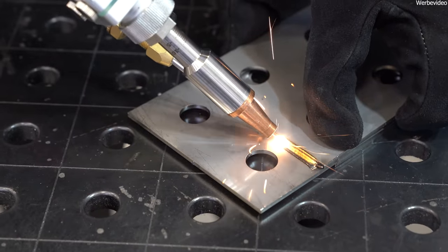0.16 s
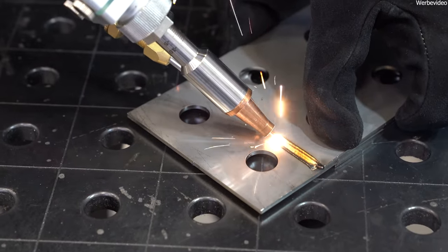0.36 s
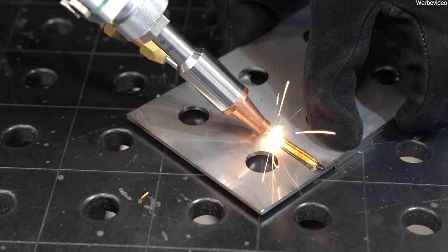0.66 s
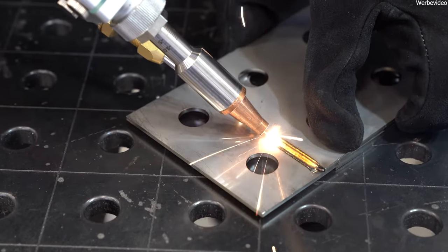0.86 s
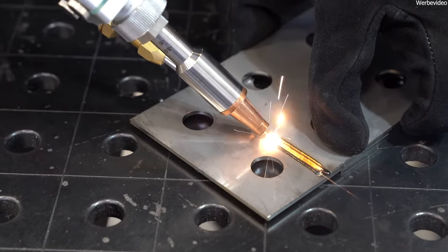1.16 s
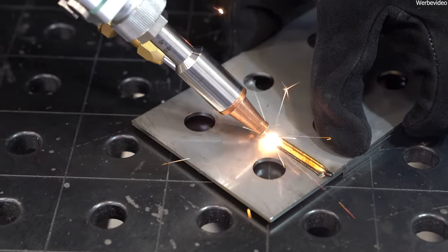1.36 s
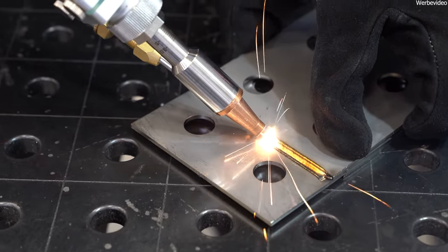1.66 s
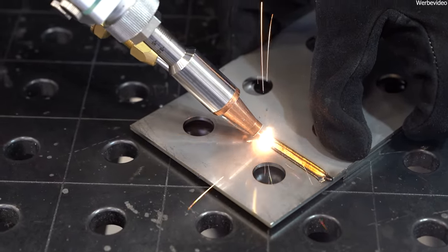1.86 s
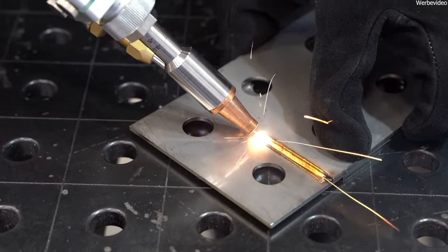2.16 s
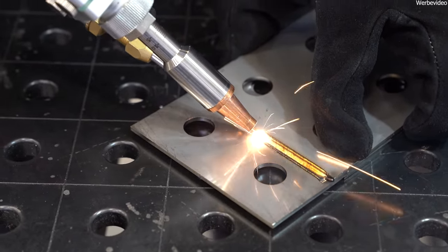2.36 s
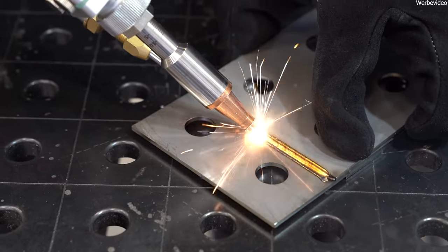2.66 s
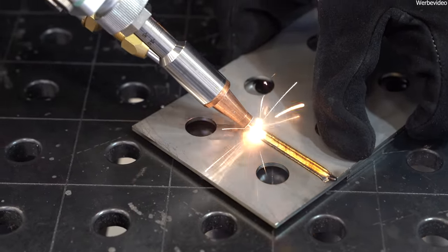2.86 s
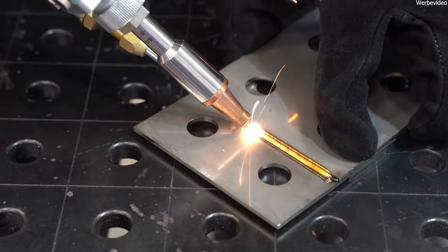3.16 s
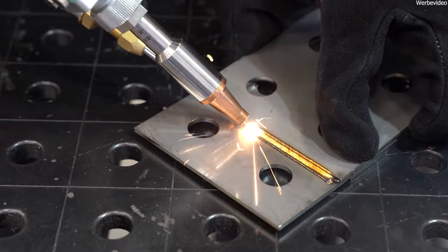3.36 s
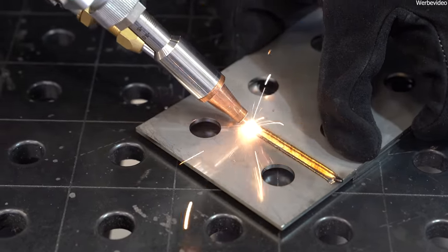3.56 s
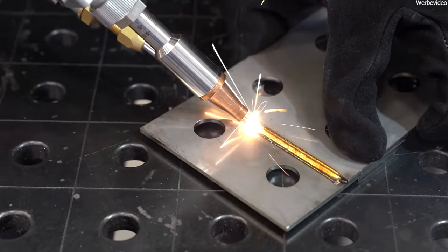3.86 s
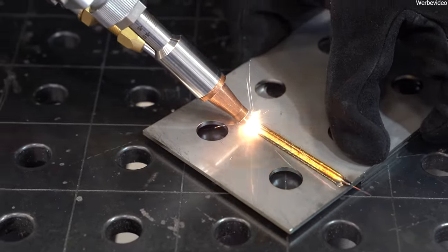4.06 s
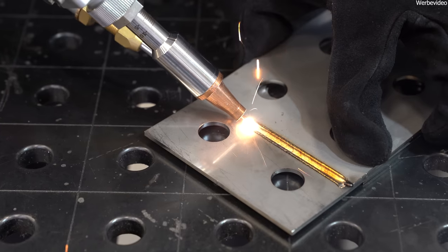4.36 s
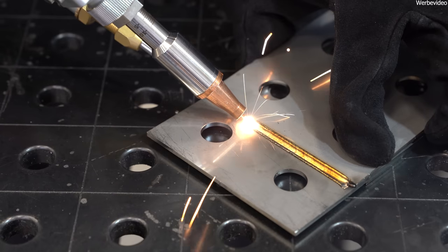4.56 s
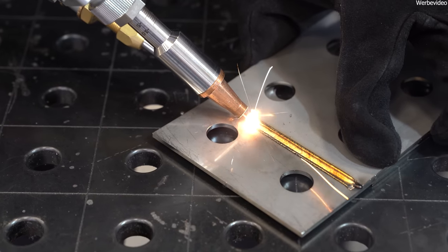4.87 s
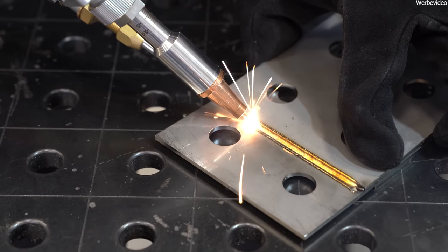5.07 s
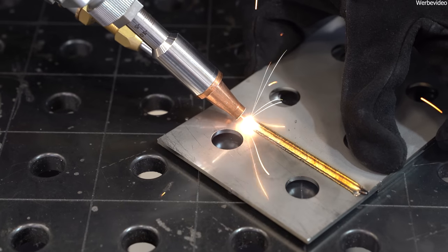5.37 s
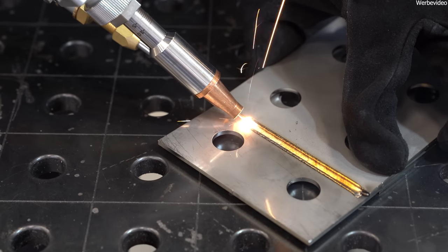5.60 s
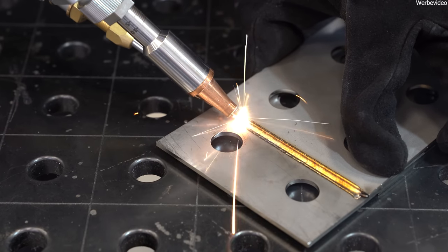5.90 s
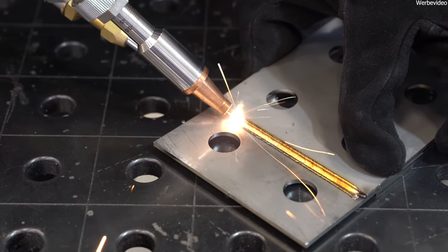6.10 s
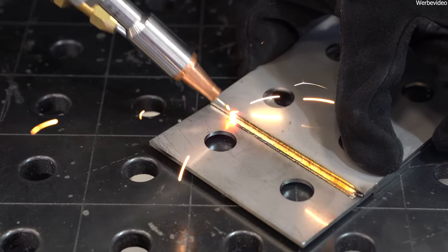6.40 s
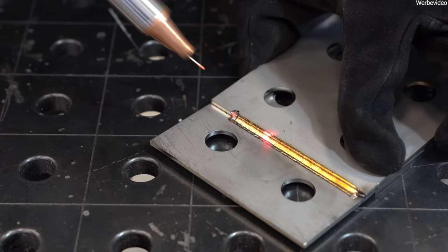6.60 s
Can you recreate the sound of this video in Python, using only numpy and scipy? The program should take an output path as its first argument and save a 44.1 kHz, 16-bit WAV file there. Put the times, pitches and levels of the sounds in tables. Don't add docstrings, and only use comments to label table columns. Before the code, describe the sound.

A continuous, treble-heavy rush of metal vapour dominates, rough and crackly, fluttering about fifty times a second while its colour shifts slowly. Fans hum and whoosh quietly underneath. Near the end the weld hiss surges, breaks up and snaps off with a soft puff, then a tiny spark tick. The microphone is close, with faint reflections from the bench and shop.

```python
import sys
import numpy as np
from scipy import signal
from scipy.fft import rfft, irfft
from scipy.io import wavfile

SR = 44100
rng = np.random.default_rng(int(sys.argv[2]) if len(sys.argv) > 2 else 0)


def put_to_file(sound):
    columns = np.atleast_2d(sound).T
    safe = np.clip(columns, -1, 1)
    whole_steps = np.round(safe * 32767)
    wavfile.write(sys.argv[1], SR, whole_steps.astype(np.int16))


def gain_from_db(level_db):
    decades = np.asarray(level_db, float) / 20
    return 10 ** decades


N = 297230

# pitch_hz, level_db (per Hz)
FAN_COLOUR = [(20, -25), (50, -6.5), (110, -5.5), (220, -8), (450, -11.5), (600, -11.5), (790, -1),
              (1000, -15), (1320, -7.5), (1700, -20.5), (2700, -28.5), (8000, -25.5), (12500, -38),
              (15700, -48)]
# pitch_hz, width_hz, level_db
FAN_RESONANCES = [(54, 7.3, 2), (89.4, 6.2, -4), (112, 6, 3), (160.4, 2.3, 7.5), (217.7, 9, 4.5),
                  (312, 15, 2.5), (468.4, 4.8, 5.5), (562, 18, 2.5), (616.4, 10.4, 7), (758, 7.7, 1),
                  (854, 11, 0.5), (884.6, 6.6, 8), (1137, 32, 4), (1360, 41, 2), (2044, 73, 6),
                  (173.6, 5, 4.5), (198, 5, 1.5), (256, 4.6, -4), (272, 11, 0.5), (373, 9.7, 2.5),
                  (429, 10, -1), (507, 20, -3), (587, 6, 2), (700, 8.9, -1), (916, 5.6, -11), (942, 17, 1),
                  (3630, 430, 2), (5140, 200, -4.5)]
# time_s, level_db
FAN_LOAD_PATH = [
    (0.0, -27),
    (0.02, -26.5),
    (0.62, -27.5),
    (3.72, -25),
    (6.55, -26.5),
    (6.74, -26.5),
]
# pitch_hz, fall_by_60_db_s
SHOP_RING = [(2000, 0.6), (7000, 0.63), (11000, 0.77), (15000, .15)]
# delay_s, delay_change_s_per_s, level_db
NEAR_ECHOES = [(.00214, 1e-5, -22), (.00266, 0, -19), (.00313, 1e-5, -21), (.0040, 2e-5, -21),
               (.0049, -2e-5, -22), (.0058, 3e-5, -23), (.0066, -1e-5, -23), (.0076, 1e-5, -23),
               (.0091, -3e-5, -26), (.0118, 2e-5, -28)]
# pitch_hz, level_db (per Hz)
PLUME_COLOUR = [(1700, -24.1), (2100, -16.7), (2650, -21.0), (3200, -14.3), (3900, -15.6), (4600, -16.5),
                (5200, -8.0), (5900, -0.6), (7000, -4.5), (8300, -1.5), (10000, -3.8), (12500, -10.5),
                (14500, 0.0), (15700, -11.0)]
# time_s, pitch_factor
TORCH_PATH = [(0.0, 1.01), (0.6, .99), (1.2, .945), (2.2, .905), (3.4, .865), (4.3, .835), (5.0, .842),
              (5.8, .878), (6.5, .875)]
# pitch_hz, width_hz, level_db, strongest_s, lasting_s
SLIDING_BANDS = [(10750, 340, -13, .35, 0.67), (9830, 200, -7, 2.5, 1.1), (9000, 350, -8.5, 4.43, 0.53),
                 (8970, 380, 4, 1.04, 1.4), (7760, 380, -3, 1.7, 2.7), (11530, 120, -8, 3, .55),
                 (11650, 170, -7, 5.6, .4), (12330, 640, 15.5, 4.85, 1.02), (9040, 68, 4.0, 4.0, 0.69)]
# pitch_hz, width_hz, level_db, strongest_s, lasting_s
PLATE_LOBES = [(5370, 560, -14, 5.97, 0.9), (5200, 360, -5.5, 3.3, 1.06), (5900, 420, -3, .3, 0.64),
               (12340, 680, 6.5, 1, 1.35), (12600, 570, 2, 3.87, 0.43), (14850, 820, -7, .2, .9),
               (14400, 820, -12.5, 2.1, 0.85), (14800, 820, -6.5, 5.1, 0.9)]
# pitch_hz, width_hz, level_db, strongest_s, lasting_s
FIXED_FRINGES = [(2000, 50, 4.7, 4.0, 3.7), (3240, 310, 2.8, 5.5, .3), (3250, 60, -4.5, .3, 2.0),
                 (3500, 110, -8.6, 6.7, 4.9), (3530, 330, 5.1, 3.4, 1.3), (4150, 110, -5.3, 4.9, 3.7),
                 (4700, 150, 3.7, 5.7, 1.5), (4890, 70, -3.5, 5.7, 3.4), (5200, 130, -6.3, 6.2, 1.9),
                 (5340, 90, 6.7, 5.6, 3.1), (6480, 90, -8.6, 2.3, 1.4), (6510, 140, 7.3, 3.0, 1.1),
                 (7030, 70, 5.2, -.4, 3.8), (8060, 160, 4.4, 3.5, 2.5), (8290, 130, -6.3, 2.0, 1.4),
                 (8690, 80, -5.3, 2.8, 1.9), (9420, 70, -7.0, 4.0, 1.0), (9990, 130, -10, 3.3, .9),
                 (9950, 120, -12, 5.9, .5), (10370, 120, 5.6, 3.4, 1.9), (10810, 170, -4.9, 3.5, 1.0),
                 (11140, 120, 7.7, 6.1, .6), (11260, 70, -7.0, .7, .4), (13290, 120, 3.1, 4.8, .3)]
# sag_start_s, sag_end_s
BEAM_TURNS = [
    (.0122, .0193),
    (.0328, .0393),
]
# time_s, lasting_s, level_db
SWEEP_FLARES = [
    (.0027, .003, 1.8),
    (.021, .0013, 1.3),
    (.0279, .0012, 1.8),
    (.0321, .0006, 1.6),
]
# time_s, level_db
PLUME_LEVEL = [
    (0.0, -19),
    (0.09, -18),
    (1.4, -19.5),
    (1.65, -18.5),
    (2.24, -19.5),
    (3.2, -18),
    (3.25, -19.5),
    (4.13, -17),
    (6.11, -18),
    (6.45, -16),
]
# time_s, level_db
BEAM_CUT_OUT = [
    (6.4525, 0),
    (6.4545, -12),
    (6.4583, -22),
    (6.4587, -3),
    (6.462, -6),
    (6.4655, -11),
    (6.4665, -60),
]

SWEEP_S = .04
PUFF_S = 6.4587
SPARK_S = 6.492


def rms_one(x):
    return x / np.sqrt(np.mean(x ** 2) + 1e-20)


def at_hz(points, hz):
    table = np.array(points)
    return np.interp(np.log(hz + 1), np.log(table[:, 0]), table[:, 1])


def bump(x, centre, width):
    return np.exp(-.5 * ((x - centre) / width) ** 2)


def drift(rate_hz):
    r = np.exp(-2 * np.pi * rate_hz / SR)
    wander = signal.lfilter([1], [1, -2 * r, r * r], rng.standard_normal(N + 20000))
    return rms_one(wander[20000:])


def causal(gain):
    cepstrum = irfft(np.log(gain), axis=0)
    half = len(cepstrum) // 2
    cepstrum[1:half] *= 2
    cepstrum[half + 1:] = 0
    return np.exp(rfft(cepstrum, axis=0))


def fans(t):
    hz = np.arange(N // 2 + 1) * SR / N
    colour_db = at_hz(FAN_COLOUR, hz)
    for centre, width, db in FAN_RESONANCES:
        colour_db += db * bump(hz, centre, width)
    noise = rfft(rng.standard_normal(N)) * gain_from_db(colour_db)

    rumble_hz = 400
    high = noise * (hz > rumble_hz)
    rush = irfft(high, N)
    rush /= np.std(irfft(high * (hz < 4 * rumble_hz), N))
    rumble = rms_one(irfft(noise * (hz <= rumble_hz), N))

    rush_db = np.interp(t, *np.transpose(FAN_LOAD_PATH))
    rumble_db = -30.5 + 0.77 * (rush_db - rush_db.mean())
    waver_db = 0.51 * drift(8.4)
    return rush * gain_from_db(rush_db + waver_db) + rumble * gain_from_db(rumble_db)


def shop(x):
    hz, s, frames = signal.stft(rng.standard_normal(SR), SR, nperseg=256)
    fade_db = -60 * s / at_hz(SHOP_RING, hz)[:, None]
    tail = signal.istft(frames * gain_from_db(fade_db), SR, nperseg=256)[1]
    tail = tail / np.sqrt(np.sum(tail ** 2))
    before = x[:SR][::-1]
    return signal.fftconvolve(np.r_[before, x], tail)[SR:SR + N]


def echoes(x, t):
    fine = signal.resample_poly(x, 4, 1)
    fine_t = np.arange(len(fine)) / (4 * SR)
    total = np.zeros(N)
    for delay, creep, db in NEAR_ECHOES:
        total += gain_from_db(db) * np.interp(t - delay - creep * t, fine_t, fine, left=0)
    return total


def puff(t):
    puff_db, fall_by_60_db_s = -20, 0.036
    since = np.maximum(t - PUFF_S, 0)
    burst = rng.standard_normal(N) * (t > PUFF_S) * gain_from_db(-60 * since / fall_by_60_db_s)
    band = signal.butter(2, [2000, 6000], "band", fs=SR, output="sos")
    return gain_from_db(puff_db) * signal.sosfilt(band, burst + 1e-18)


def spark():
    tick = np.zeros(N)
    at = round(SPARK_S * SR)
    tick[at:at + 3] = gain_from_db(-42) * np.array([1, -2, 1])
    return tick


def reflections(x):
    hz, s, frames = signal.stft(x, SR, nperseg=1024)
    pitch = hz[:, None]
    colour_db = at_hz(PLUME_COLOUR, hz)[:, None] - 40 * (pitch < 1500) + 0 * s
    path = np.transpose(TORCH_PATH)
    for centre, width, db, at, lasting in SLIDING_BANDS:
        moving_hz = centre * np.interp(s, *path) / np.interp(at, *path)
        colour_db += db * bump(pitch, moving_hz, width) * bump(s, at, lasting)
    for centre, width, db, at, lasting in PLATE_LOBES + FIXED_FRINGES:
        colour_db += db * bump(pitch, centre, width) * bump(s, at, lasting)

    gain = gain_from_db(colour_db)
    treble = (hz > 5500) & (hz < 15500)
    gain /= np.sqrt(np.sum(gain[treble] ** 2, axis=0) / len(hz))
    return signal.istft(frames * causal(gain), SR, nperseg=1024)[1][:N]


def sweep_db(t):
    fall_s, rise_s = .0026, .0007
    depths_db = (-8, -9)
    first_shares = (1.0, 0.57)
    within = t % SWEEP_S
    sag_db = np.zeros(N)
    for (start, end), depth_db, first in zip(BEAM_TURNS, depths_db, first_shares):
        corners_s = [start, start + fall_s, end - rise_s, end]
        sag_db += depth_db * np.interp(within, corners_s, [0, first, 1, 0])

    flare_db = np.zeros(N)
    for at, lasting, db in SWEEP_FLARES:
        flare_db += db * (bump(within, at, lasting) + bump(within - SWEEP_S, at, lasting))
    seam_end = bump(t, 6.44, .06)
    return sag_db * (1 - .8 * seam_end) + flare_db


def plume(t):
    ticks_per_s = 500
    tick_db = 2.5 * np.minimum(rng.exponential(1, N), 3)
    ticks = (rng.random(N) < ticks_per_s / SR) * gain_from_db(tick_db) * rng.choice([-1, 1], N)
    hiss = rng.standard_normal(N) + 1.3 * np.diff(ticks, prepend=0)
    flicker_db = .8 * drift(800) + .25 * drift(40)
    swept = rms_one(hiss * gain_from_db(sweep_db(t) + flicker_db))
    return swept * gain_from_db(np.interp(t, *np.transpose(BEAM_CUT_OUT)))


def scene():
    t = np.arange(N) / SR
    plume_db = np.interp(t, *np.transpose(PLUME_LEVEL))
    torch = reflections(plume(t)) * gain_from_db(plume_db) + spark()
    room = echoes(torch, t) + gain_from_db(-22) * shop(torch)
    return (fans(t) + room + puff(t) + torch)[None, :]


def low_pass(x):
    return signal.sosfilt(signal.butter(12, 16180, fs=SR, output="sos"), x)


def record(dry):
    return low_pass(dry)


dry = scene()
out = record(dry)
put_to_file(out)
```